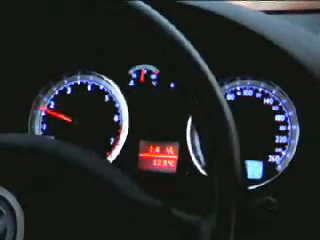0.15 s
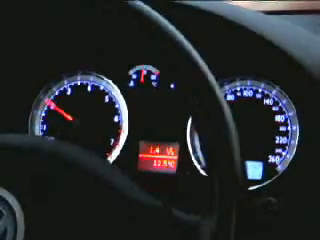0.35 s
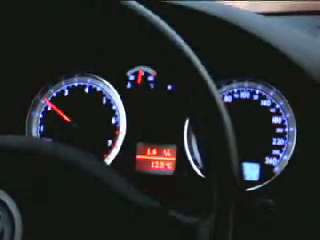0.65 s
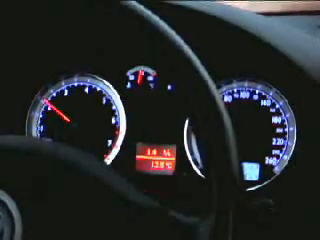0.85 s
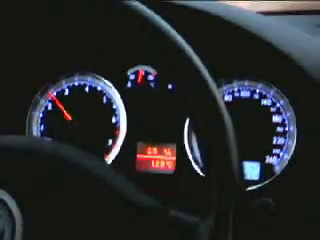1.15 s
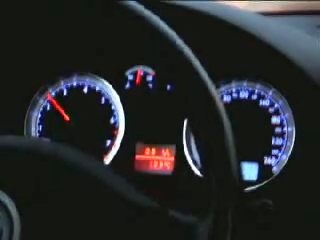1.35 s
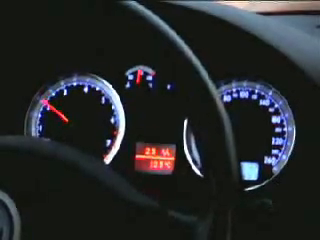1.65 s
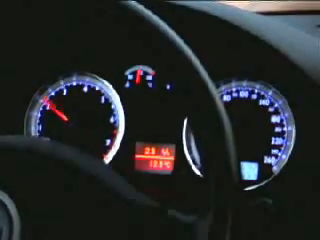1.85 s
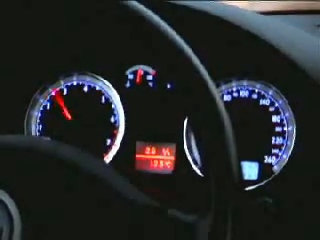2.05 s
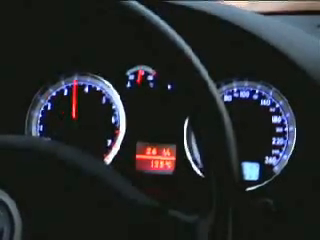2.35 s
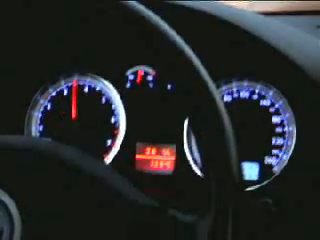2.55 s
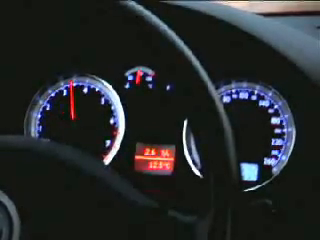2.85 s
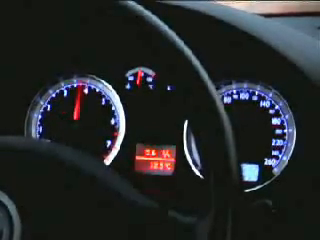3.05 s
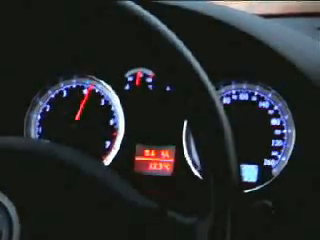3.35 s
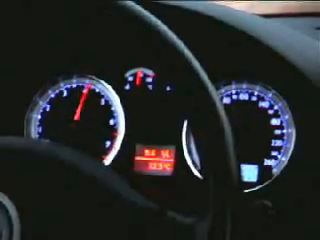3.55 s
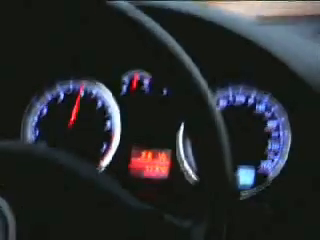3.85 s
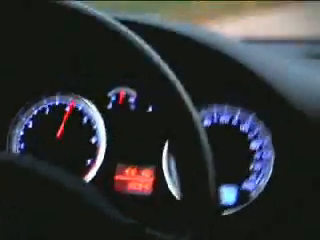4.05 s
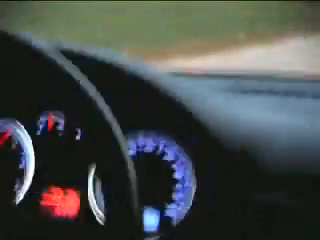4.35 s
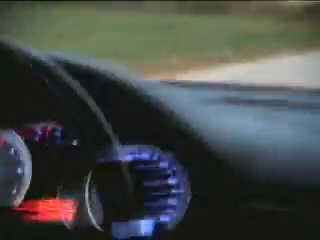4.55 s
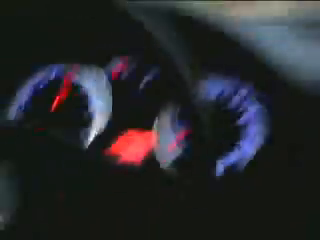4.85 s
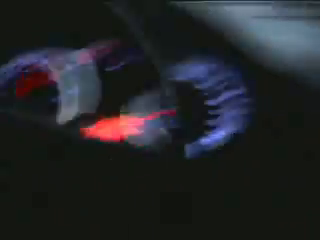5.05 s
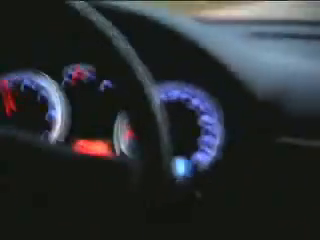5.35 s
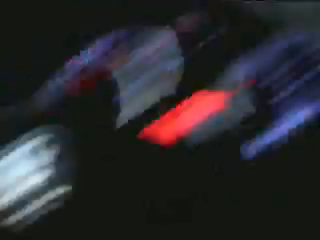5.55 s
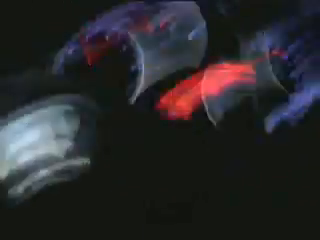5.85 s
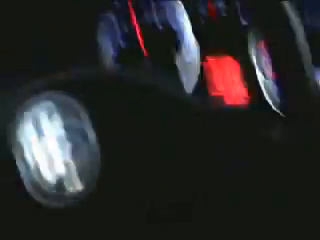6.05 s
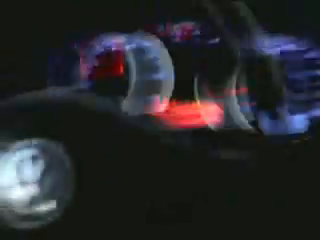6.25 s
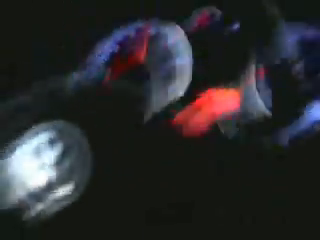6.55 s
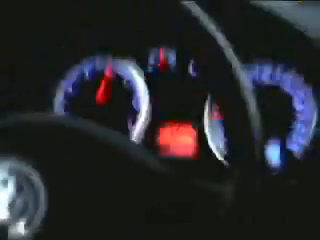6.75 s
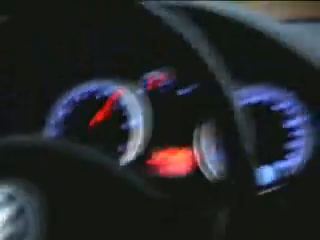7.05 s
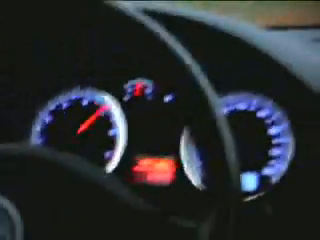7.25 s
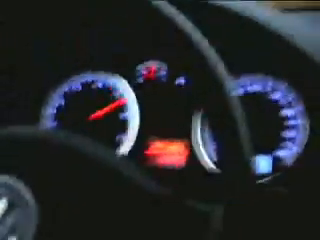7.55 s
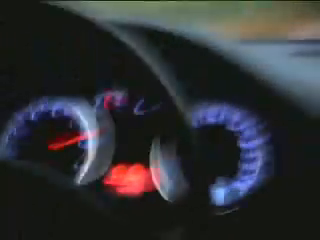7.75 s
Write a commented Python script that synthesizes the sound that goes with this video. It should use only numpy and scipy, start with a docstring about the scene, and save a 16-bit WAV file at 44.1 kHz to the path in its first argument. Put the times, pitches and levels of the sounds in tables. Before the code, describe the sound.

Inside a car, a small handheld camcorder picks up a sporty four-cylinder petrol engine as a low, boomy, slightly burbling drone. A quick blip peaks at about 0.2 s and falls, another peaks near 0.9 s, and a bigger one swells from 1.6 to 2.1 s before sinking. Revs rise again to 3.0 s, ease, then pull to about 4.1 s. From there the pitch slides down to its low around 5.4 s as the car slows for a corner. Between 4.1 and 5.5 s come plastic rubbing strokes, a sharp knock at 4.4 s, low buffeting, short squeaks around 4.8 to 5.0 s, more knocks at 5.1 s and faint ratchet ticks at 5.25 s. Road rumble grows. From 5.5 s the engine pulls continuously, climbing well over an octave into a hard, raspy growl still rising at the end. Faint hiss and thin whine remain throughout.

```python
"""Inside a four-cylinder petrol car, driver's seat: three throttle blips, a pull, a slowing for a corner, a long pull out.
Firing rate and load drive the exhaust's sine orders, uneven quarter orders, pulse-rung intake growl and clatter.
Coloured noise makes road rumble and roar; in the corner, buffeting, rubs, squeaks, trim clicks and ratchet ticks.
A camcorder adds hiss, notches at multiples of its drum rate, clock-jitter side tones and a faint motor whine."""
import sys
import numpy as np
from scipy.fft import rfft, irfft, next_fast_len
from scipy.io import wavfile
from scipy.ndimage import uniform_filter1d, map_coordinates

SR = 44100
rng = np.random.default_rng(int(sys.argv[2]) if len(sys.argv) > 2 else 0)


def unload_wav(signal):
    """Save mono or channel-first audio to the path in sys.argv[1] as 16-bit WAV at rate SR, clipped to [-1, 1]."""
    wavfile.write(
        sys.argv[1],
        SR,
        np.round(np.clip(np.atleast_2d(signal).T, -1, 1) * 32767).astype(np.int16),
    )


N = 348831
TIME = np.arange(N) / SR
STEPS = TIME[::64]  # time grid of the slow controls
START_LOAD = 1

# throttle moves: [t/s, new load, new boom level/dB, new growl level/dB, brief boom loss/dB,
# snap length/s, thump envelope level/dB]
THROTTLE = [(0.201,0,-0.5,2,21,.013,-27),(0.556,.95,0,-2.5,3,.015,-23),(.942,0.041,-.5,1,8.5,0.0079,-19.5),(1.506,1.03,0.5,-6.5,11,.035,-36),(2.078,0,2,-5,6.5,0.02,-30.5),(2.518,0.98,-1.5,0.5,5,.019,-26.5),(2.82,0.88,2,-3,-1,0.016,-43.5),(3.019,.25,2.5,1.5,5.5,0.0084,-21.5),(3.391,0.23,-1.5,2,4,0.014,-23),(3.689,0.92,2.5,-3,8,0.03,-48),(4.3,1.18,-3.5,3,-3,0.012,-44.5),(5.2,1.13,0,2.5,-0.5,.015,-39),(5.6,1.025,-.5,2,-1.5,0.017,-46.5),(6.551,1.31,-0.5,7,-0.5,.03,-36.5),(6.95,1.19,2.5,3.5,-3,0.013,-42.5),(7.351,0.73,0.5,-2,-1,0.021,-42.5)]
# ring of the dashboard plastic: [f/Hz, relative level/dB]
PLASTIC = [(200, -15), (520, 2), (790, 4), (1000, 0), (1550, 0), (2100, -6.5), (2550, -7.5), (2950, -7.5),
           (3350, -10.5), (3800, -11.5), (4500, -16), (6000, -21), (8500, -22), (14000, -33)]


def amp(db):
    """Decibels to gain."""
    return np.exp(np.asarray(db) * (np.log(10) / 20))


def unit(x):
    """Scale to rms 1."""
    return x / np.sqrt(np.mean(x ** 2) + 1e-20)


def along(points, hz):
    """(Hz, value) points read on a log frequency axis."""
    f, v = np.transpose(points)
    return np.interp(np.log(hz + 1), np.log(f + 1), v)


def curves(rows):
    """One value per sample for each column after the time."""
    s, *cols = np.transpose(rows)
    return [np.interp(TIME, s, c) for c in cols]


def fine(control):
    """A slow control, at every sample."""
    return np.interp(TIME, STEPS, control)


def drift(rate):
    """A smooth random slow control, rate knots a second."""
    knots = rng.standard_normal(int(TIME[-1] * rate) + 4)
    return map_coordinates(knots, [STEPS * rate])


def wobble(rate):
    """A smooth random curve at every sample."""
    return fine(drift(rate))


def bell(s, length):
    """A brief swell around a moment, as a slow control."""
    return np.exp(-((STEPS - s) / length) ** 2)


def held(start, end, fade, swell_db=0):
    """Slow gain that swells to 1 between start and end, and fades on either side."""
    progress = np.clip((STEPS - start) / (end - start), 0, 1)
    outside = np.maximum(start - STEPS, 0) + np.maximum(STEPS - end, 0)
    return amp(swell_db * (progress - 1)) * np.exp(-outside / fade)


def filtered(x, response):
    """x times a complex response of frequency."""
    m = next_fast_len(N + SR // 2)
    return irfft(rfft(x, m) * response(np.fft.rfftfreq(m, 1 / SR)), m)[..., :N]


def coloured(x, spectrum):
    """x with the given spectrum and a smooth rolloff at the top, at rms 1."""
    def response(hz):
        rolloff = (1 + (hz / spectrum[-1][0] / 2) ** 2) ** 2
        return amp(along(spectrum, hz)) / rolloff
    return unit(filtered(x, response))


def resonances(modes, hz):
    """Causal response of (Hz, width Hz, dB) modes with steep skirts."""
    total = 0
    for centre, width, db in modes:
        damping = 1j * hz * width
        total = total + amp(db) * (damping / (centre ** 2 - hz ** 2 + damping)) ** 2
    return total


def spread(mid, side):
    """Left and right from mid and side."""
    return np.array([mid + side, mid - side])


def rush(spectrum, side_db):
    """Nearly mono stereo noise of about rms 1."""
    mid, side = coloured(rng.standard_normal((2, N)), spectrum)
    return spread(mid, amp(side_db) * side)


def road():
    """Rumble through the body, roar from the tyres, and buffeting in the corner."""
    # road roughness: [t/s, tyre roar level/dB, body rumble level/dB]
    roughness = [(0,-64,-50.5),(1.6,-59,-44),(3.8,-54,-42.5),(4.4,-42,-34.5),(4.9,-47.5,-31),(5.6,-54,-34.5),(6.4,-55,-30.5),(6.85,-49.5,-25.5),(7.9,-59.5,-38)]
    # body colour: [f/Hz, relative level/dB]
    rumble_colour = [(15, -33.5), (35, -4), (55, -2.5), (90, 6), (125, 2.5), (170, -19), (300, -42.5)]
    # tyre colour: [f/Hz, relative level/dB]
    roar_colour = [(150, -9), (500, 2), (1000, 0), (1500, -10), (2200, -17), (3200, -21), (5000, -24.5),
                   (8000, -36), (14000, -34.5)]
    buffet_colour = [(15, -23), (33, -0.5), (55, -2), (80, -6.5), (140, -34.5)]  # [f/Hz, relative level/dB]
    start_s, end_s, fade_s, buffet_db = 4.66, 5.33, 0.049, -25  # the camera swings

    roar_db, rumble_db = curves(roughness)
    rumble = amp(rumble_db + 1.4 * wobble(5.5)) * rush(rumble_colour, side_db=-20)
    roar = amp(roar_db + 1.8 * wobble(28)) * rush(roar_colour, side_db=-15.5)
    swing = amp(buffet_db) * fine(held(start_s, end_s, fade_s, swell_db=4))
    buffet = swing * rush(buffet_colour, side_db=-14.5)
    return rumble + roar + buffet


def ratchet(count=4, start_s=5.239, step_s=.0408, level_db=-48, t60_s=.07):
    """A ratchet in the steering column: thin, evenly spaced ticks as the wheel turns back."""
    # tick resonances: [f/Hz, width/Hz, relative level/dB]
    modes = [(5150, 1500, 0), (9250, 3500, -1.5), (13500, 3500, -5)]
    since = STEPS - (start_s + step_s * np.arange(count))[:, None]
    level = np.sum((since > 0) * amp(level_db - 60 * np.abs(since) / t60_s), axis=0)
    noise = rng.standard_normal(N)
    return fine(level) * unit(filtered(noise, lambda hz: resonances(modes, hz)))


def clicks(sharpness=0.54, side_db=-14, attack_s=0.001):
    """Loose trim: short knocks on the plastic; harder contacts reach its higher modes."""
    # trim clicks: [t/s, level/dB, centre f/Hz, t60/s]
    knocks = [(.399,-32.5,646.2,0.029),(.401,-51.5,5520,0.05),(1.255,-51,4000,0.044),(4.145,-45,6940,0.081),(4.296,-40.5,7020,.06),(4.413,-25.5,800.3,0.058),(4.428,-19,3900,0.039),(4.432,-32.5,1710,0.075),(4.486,-33.5,5410,0.068),(5.124,-31,3560,0.085),(5.138,-25,766,.12),(5.14,-36.5,8990,0.077),(5.454,-38.5,6040,0.052),(5.79,-49,2988,.06),(5.597,-45,14400,0.027),(6.387,-44.5,7170,0.05)]
    out, t = np.zeros((2, N + SR)), TIME[:SR // 4]
    hz = np.fft.rfftfreq(len(t), 1 / SR)
    ring = amp(along(PLASTIC, hz))
    for s, db, centre_hz, t60_s in knocks:
        contact = resonances([(centre_hz, centre_hz / sharpness, 0)], hz)
        noise = rng.standard_normal((2, len(t)))
        mid, side = unit(irfft(rfft(noise) * contact * ring, len(t)))
        envelope = amp(db - 60 * t / t60_s) * (1 - np.exp(-t / attack_s))
        first = round(s * SR)
        out[:, first:first + len(t)] += spread(mid, amp(side_db) * side) * envelope
    return out[:, :N]


def squeaks(waver=0.015, overtone_db=-19):
    """Now and then the slide sticks and squeaks: a wavering tone and its octave."""
    # squeaks: [middle t/s, length/s, mean f/Hz, level/dB]
    slips = [(4.804, .014, 1288, -27), (4.936, .014, 1280, -27.5), (5.011, 0.018, 1268, -26),
             (5.034, 0.0085, 1283, -30)]
    middles, _, pitches, _ = np.transpose(slips)
    rate_hz = np.interp(TIME, middles, pitches) * (1 + waver * wobble(200))
    phase = 2 * np.pi * np.cumsum(rate_hz) / SR
    # flat-topped swells
    swells = [amp(db) * np.exp(-((STEPS - s) / length) ** 4 / 2) for s, length, _, db in slips]
    tone = np.sin(phase) + amp(overtone_db) * np.sin(2 * phase)
    return fine(np.max(swells, axis=0)) * tone


def strokes(grain_db=3.0, ring_db=-19, swell_db=7, fade_s=.035):
    """Rubbing at the wheel: each stroke drags grains over the plastic, rings it and presses harder as it goes."""
    # rubs: [start t/s, end t/s, level at the end/dB]
    rubs = [(4.104,4.365,-55.5),(4.389,4.441,-35.5),(4.59,4.828,-36),(4.871,5.136,-32),(5.228,5.46,-48)]
    # ring under the rub: [f/Hz, width/Hz, relative level/dB]
    ring_modes = [(2500, 520, -2.5), (2920, 360, -5)]
    grains = rng.standard_normal((2, N)) * amp(grain_db * wobble(400))
    mid, side = coloured(grains, PLASTIC)
    ring = unit(filtered(grains[0], lambda hz: resonances(ring_modes, hz)))
    pressures = [amp(db) * held(start, end, fade_s, swell_db) for start, end, db in rubs]
    return fine(np.max(pressures, axis=0)) * spread(mid + amp(ring_db) * ring, amp(-18.5) * side)


def settled(start, column, rise_s=0.16, fall_s=0.04):
    """A throttle column lagging to each new value: the manifold fills slowly and empties fast."""
    value, before, load = np.full(len(STEPS), float(start)), start, START_LOAD
    for row in THROTTLE:
        lag_s = rise_s if row[1] > load else fall_s
        value += (row[column] - before) * (1 - np.exp(-np.maximum(STEPS - row[0], 0) / lag_s))
        before, load = row[column], row[1]
    return fine(value)


def effort(law, rate_hz, load, mid_rate_hz=120, harsh_hz=152, harsh_width_hz=13):
    """Gain of a rough layer: follows load and speed, and rises at the firing rate where the engine shakes most."""
    full_db, shut_db, octave_db, harsh_db = law
    harsh = np.exp(-((rate_hz - harsh_hz) / harsh_width_hz) ** 2)
    load_db = full_db - shut_db * (1 - load)
    speed_db = octave_db * np.log2(rate_hz / mid_rate_hz)
    return amp(load_db + speed_db + harsh_db * harsh * load)


def clatter():
    """The even wash of valves and gears, as coloured noise."""
    # clatter colour: [f/Hz, relative level/dB]
    colour = [(150,-10.5),(500,3),(1000,0),(1500,-8),(2200,-13),(3200,-17),(5000,-31.5),(8000,-35),(14000,-39.5)]
    return rush(colour, side_db=-16)


def rasp(firings, scatter=0.24, gas_db=1.5, timing_s=0.00013):
    """One pulse per firing rings the intake; unequal paths break it into a growl. Gas hisses in step."""
    # cylinders: [relative pulse size, travel time/s]
    cylinders = [(1.38, 0.00022), (1.2, 0.0013), (1.3, 0.00015), (.6, 0.00015)]
    # intake resonances: [f/Hz, width/Hz, relative level/dB]
    intake = [(338, 74, 5), (548, 75, 0.5), (646, 53, -5), (814, 100, -19), (1125, 78, -15),
              (1426, 78, -14), (1870, 27, -18), (2130, 120, -24)]
    # gas colour: [f/Hz, relative level/dB]
    gas_colour = [(60, -45), (150, -8.5), (230, 7.5), (340, 1), (430, 1), (530, -2), (680, -3), (900, -12),
                  (1150, -22), (1700, -22.5), (2500, -35.5), (4000, -37.5), (9000, -56)]
    at = np.flatnonzero(np.diff(np.floor(firings)))
    sizes, travel_s = np.resize(cylinders, (len(at), 2)).T
    # no two burns are alike
    travel_s = travel_s + timing_s * rng.standard_normal(len(at))
    sizes = sizes * (1 + scatter * rng.standard_normal(len(at)))
    arrival = np.clip(at + np.round(travel_s * SR).astype(int), 0, N - 1)
    pulses = np.bincount(arrival, sizes, N)
    growl = unit(filtered(pulses, lambda hz: resonances(intake, hz)))
    puffing = 1 + 0.26 * np.cos(2 * np.pi * firings)
    gas = coloured(rng.standard_normal(N) * puffing, gas_colour)
    return unit(growl + amp(gas_db) * gas)


def burble(firings, rate_hz, waver_db=4.0, slip_rad=0.74):
    """Unequal cylinders add quarter orders, whose balance shifts as they sweep the cabin's resonances."""
    # partials: [multiple of the firing rate, relative level/dB]
    uneven = [(.5, -4.5), (.75, -7), (1.25, 3), (1.5, -6), (1.75, -1), (2.25, -5), (2.5, -6), (2.75, -6.5),
              (3.25, -4), (3.5, -6.5), (3.75, -3), (4, 2), (5, 0.5), (5.5, -2.5), (6, -2)]
    # cabin response: [f/Hz, relative level/dB]
    cabin = [(30, -37), (55, -24.5), (75, 0), (110, -4.5), (160, -6), (195, 1.5), (235, 2.5), (280, -3.5),
             (345, -4.5), (420, -12), (530, -16), (680, -18.5), (1040, -27.5), (1115, -14), (1220, -26),
             (1600, -22)]
    total, power = np.zeros(N), 0
    slow_rate_hz = np.interp(STEPS, TIME, rate_hz)
    for multiple, db in uneven:
        gain = amp(db + along(cabin, multiple * slow_rate_hz))
        phase = 2 * np.pi * (multiple * firings + rng.random()) + slip_rad * wobble(22)
        total += fine(gain * amp(waver_db * drift(12))) * np.sin(phase)
        power = power + gain ** 2 / 2
    return total / fine(np.sqrt(power))


def thumps(puff_hz=78):
    """Each snap of the throttle sends one slow puff down the pipe."""
    puffs = np.zeros(len(STEPS))
    for s, *_, length, db in THROTTLE:
        puffs += amp(db) * bell(s, length) * np.sin(2 * np.pi * puff_hz * (s - STEPS))
    return uniform_filter1d(fine(puffs), size=64)


def boom(firings, rate_hz, load, waver_db=2.22):
    """Clean exhaust orders sweep the pipe's resonances; load lifts the overtones, snaps briefly shift the level."""
    # orders 1, 2, 3: [level at full load/dB, loss with throttle shut/dB], before pipe and throttle gains
    order_levels = [(-19, 1), (-26, 15.5), (-31, 15)]
    # pipe and cabin response: [f/Hz, gain/dB]
    pipe = [(58,-10.5),(65,-7.5),(71,-1),(80,1),(105,-2),(128,1),(143,-4),(157,-11),(169,-2.5),(178,-8),(188,0),(207,2),(245,0.5),(290,-6),(320,-7),(360,-9),(385,-14),(470,-9),(550,-19),(630,-20.5)]
    choke_db = fine(sum(loss_db * bell(s, length) for s, *_, loss_db, length, _ in THROTTLE))
    tone = np.zeros(N)
    for k, (full_db, shut_db) in enumerate(order_levels, 1):
        load_db = full_db - shut_db * (1 - np.minimum(load, 1.05))
        db = load_db + along(pipe, k * rate_hz) + waver_db * wobble(25)
        tone += amp(db) * np.sin(2 * np.pi * (k * firings + rng.random()))
    return np.sqrt(2) * tone * amp(settled(0, column=2) - choke_db)


def engine(flywheel_s=.07):
    """One crankshaft speed and one throttle drive all layers; the flywheel rounds each change of speed."""
    # engine speed at its turning points: [t/s, firing rate/Hz]
    speed = [(0,59.3),(.16,85.34),(.5,68.73),(.7,66.26),(.9,93.4),(1.25,73.64),(1.54,58.5),(1.69,73.8),(1.97,124.4),(2.07,136.7),(2.2,125.7),(2.44,110.4),(2.65,104.5),(2.87,142.9),(3,153.6),(3.39,131.2),(3.66,129),(4.08,156.8),(4.3,152.6),(4.56,130.5),(4.79,125.8),(4.95,100.5),(5.37,80.16),(5.6,97),(5.8,105.5),(6.55,143.3),(7,168.7),(7.35,185.3),(7.9,209.4)]
    # laws: [level at full load/dB, loss with throttle shut/dB, slope/(dB per octave of speed), harsh gain/dB]
    burble_law = (-33, 8.5, 3, 2.2)
    rasp_law = (-42, 4.5, 6.5, 5)
    clatter_law = (-54, 0.5, 11, 2.5)
    rate_hz = uniform_filter1d(curves(speed)[0], int(flywheel_s * SR), mode="nearest")
    firings = np.cumsum(rate_hz) / SR
    load = settled(START_LOAD, column=1)
    growl = amp(settled(0, column=3)) * rasp(firings)
    rough = [(burble_law, burble(firings, rate_hz)), (rasp_law, growl), (clatter_law, clatter())]
    clean = boom(firings, rate_hz, load) + thumps()
    return clean + sum(effort(law, rate_hz, load) * layer for law, layer in rough)


def scene(lead_rad=0.16):
    """The cabin, picked up by two slightly unequal microphones; the left leads in the bass."""
    # channel balance: [f/Hz, left minus right/dB]
    port_level = [(60, 2.5), (180, -1), (540, -0.5), (1620, -1), (4840, 0), (14500, 1)]
    cabin = road() + ratchet() + clicks() + squeaks() + strokes() + engine()
    half = np.array([[.5], [-.5]])  # left, right

    def microphones(hz):
        return amp(half * along(port_level, hz)) * np.exp(1j * half * lead_rad / (1 + hz / 600))
    return filtered(cabin, microphones)


DRUM_HZ = 150


def drum_notches(hz, feedback=.5):
    """A comb filter with a notch at each multiple of the tape drum's rate."""
    delay = np.exp(-2j * np.pi * hz / DRUM_HZ)
    return (1 + feedback) / 2 * (1 - delay) / (1 - feedback * delay)


def record(dry, top_hz=14800):
    """Camcorder: hiss, drum notches, clock jitter, tape motor whine and band limit."""
    # hiss colour: [f/Hz, relative level/dB]
    hiss_colour = [(100, -7), (1000, -1.5), (3000, -2.5), (5000, -5.5), (8000, -9.5), (11000, -8.5),
                   (14000, -19.5)]
    # periodic jitter of the sampling clock: [f/Hz, depth/s]
    ripple = [(3900, 0.0000044), (7800, 0.0000024), (11700, 1.5e-6)]
    # tape motor: [f/Hz, peak level/dB]
    motor = [(5701, -87), (6751, -76), (7800, -82), (9302, -86), (11025, -87.5)]
    hiss = amp(-66.5) * rush(hiss_colour, side_db=-10.5)
    sound = filtered(dry + hiss, drum_notches)
    jitter_s = sum(depth * np.cos(2 * np.pi * hz * TIME) for hz, depth in ripple)
    # a timing error scales with the slope
    side_tones = jitter_s * np.gradient(sound, 1 / SR, axis=1)
    whine = sum(amp(db) * np.sin(2 * np.pi * hz * TIME + 1.4 * wobble(52)) for hz, db in motor)
    return filtered(sound + side_tones + whine, lambda hz: hz < top_hz)


dry = scene()
out = record(dry)
unload_wav(out)
```